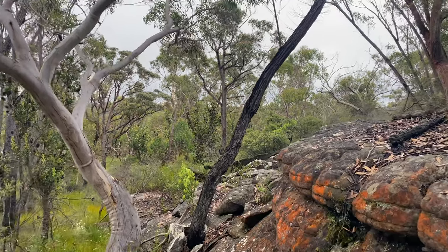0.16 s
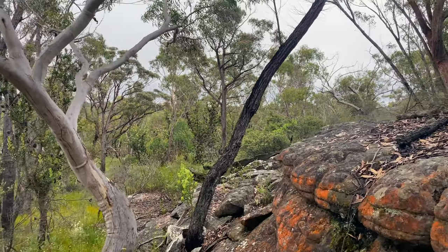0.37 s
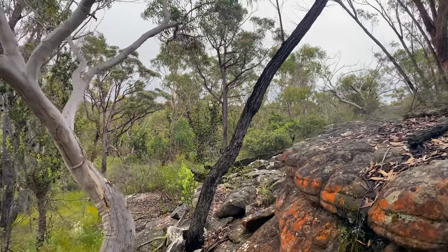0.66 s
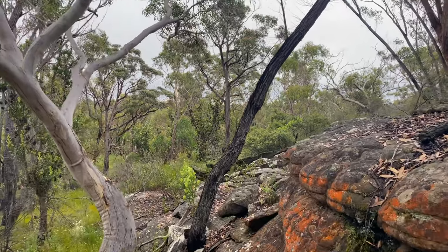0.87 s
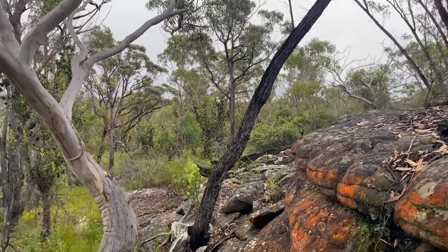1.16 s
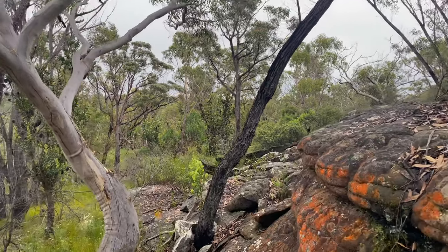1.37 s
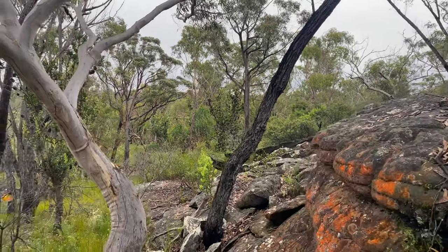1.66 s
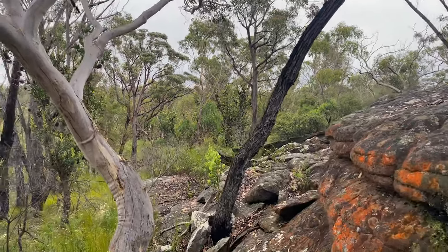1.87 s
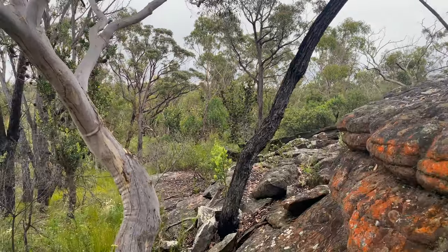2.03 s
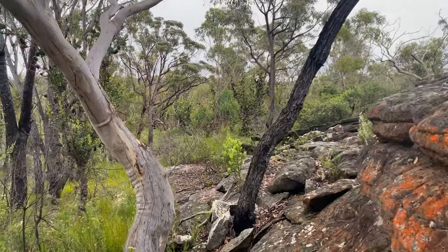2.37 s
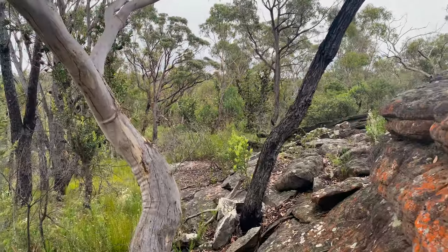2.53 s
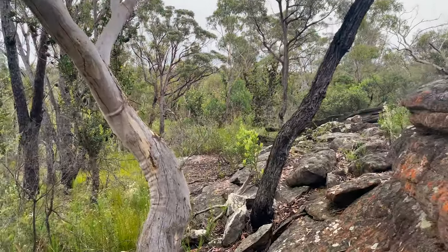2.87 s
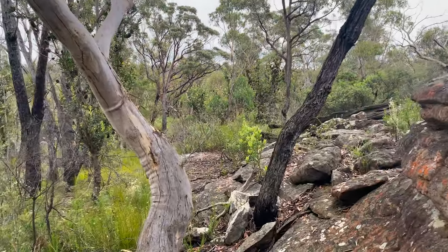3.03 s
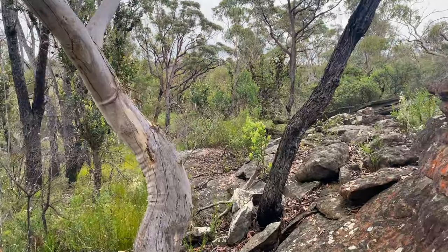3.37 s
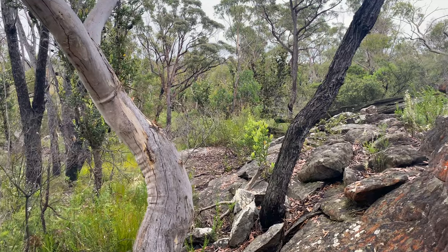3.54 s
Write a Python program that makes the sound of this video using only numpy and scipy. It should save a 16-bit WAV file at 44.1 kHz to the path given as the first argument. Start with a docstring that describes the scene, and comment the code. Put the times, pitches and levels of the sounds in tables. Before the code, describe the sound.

In open rocky bush, a lyrebird alternates trilled, descending warbles with quick whip-like whistles, densest near the end. Early handling knocks and rustling are close; a distant small bird chirps thinly over soft insect hiss.

```python
"""Dry bush: a lyrebird whistles sweeps and warbles some way off, each a gliding near-sine.
Trees scatter its notes into a tail of decaying noise, and rock returns one smeared echo.
Further away a small bird chirps thin arched whistles over shaped noise for insects and still air.
Whoever holds the microphone shifts about: noise rustle of clothes and litter, dull knocks
made of short low tone bursts, and a few dry snaps made of short ringing modes."""
import sys
import numpy as np
from scipy import signal
from scipy.io import wavfile
from scipy.ndimage import uniform_filter1d

SR = 44100
rng = np.random.default_rng(int(sys.argv[2]) if len(sys.argv) > 2 else 0)


def persist_wave(psi):
    """Save psi, clipped to +-1, as 16-bit WAV."""
    counts = np.round(np.clip(psi, -1, 1) * 32767).astype(np.int16)
    wavfile.write(sys.argv[1], SR, np.atleast_2d(counts).T)


N = 163170


def amp(db):
    """Decibels to amplitude."""
    return 10 ** (np.asarray(db) / 20)


def evened(x):
    """Scale to an RMS of one."""
    return x / np.sqrt(np.mean(x ** 2) + 1e-20)


def read(points, hz):
    """Read a curve of (frequency [Hz], value) points along a log frequency axis."""
    f, value = np.transpose(points)
    return np.interp(np.log(hz + 1), np.log(f + 1), value)


def add(mix, start_s, sound):
    """Lay a sound into the mix at its start time, cut at the end of the mix."""
    part = mix[round(start_s * SR):][:len(sound)]
    part += sound[:len(part)]


def noise(shape_db, patchy_db, flicker_db):
    """Random short-time spectra with patches and flicker, at an RMS of one; shape_db takes Hz."""
    frames, hz = N // 128 + 9, np.fft.rfftfreq(512, 1 / SR)
    real, imaginary, patches = rng.standard_normal((frames, 257, 3)).T
    patches = uniform_filter1d(patches, size=8, axis=0)  # over frequency
    patches = evened(uniform_filter1d(patches, size=16, axis=1))  # over time
    flicker = evened(uniform_filter1d(rng.standard_normal(frames), size=3))
    level_db = shape_db(hz)[:, None] + patchy_db * patches + flicker_db * flicker
    spectra = (real + 1j * imaginary) * amp(level_db)
    return evened(signal.istft(spectra, nperseg=512, noverlap=384)[1][:N])


def whistle(curve, crest_s=0, rate_hz=0, crest_db=0, point=0, lean=0):
    """One membrane: a near sine with a faint octave, pitch rocked by the warble, level fluttering."""
    octave_db, octave_db_per_hz_per_ms = -42.5, -0.06  # the octave is fainter in fast glides
    flutter_db, flutter_hz, flutter_onset_s = 2.5, 120.1, 0.054  # notes start smooth
    rows = np.transpose(curve)
    t = np.arange(rows[0][0], rows[0][-1], 1 / SR)
    since_start = t - t[0]

    beat = 2 * np.pi * rate_hz * (t - crest_s)
    leaning = beat + lean * (1 - np.cos(beat))
    pointed = 1 - 2 * abs(np.sin(leaning / 2))
    rock = (1 - point) * np.cos(leaning) + point * pointed
    hz = np.interp(t, rows[0], rows[1])
    if rate_hz:
        hz = hz + np.interp(t, rows[0], rows[3]) * rock
    turn = 2 * np.pi * np.cumsum(uniform_filter1d(hz, size=40)) / SR

    # eight sines spread around the flutter frequency, each at a random phase
    ratios, phases = np.geomspace(.3, 1.5, 8), rng.random(8)
    flutter = evened(sum(np.sin(2 * np.pi * (flutter_hz * k * t + p)) for k, p in zip(ratios, phases)))
    flutter_growth = np.minimum(since_start / flutter_onset_s, 1)
    # the warble sways the level too, fully from the second beat after the named crest
    sway_db = crest_db * np.clip(beat / (4 * np.pi), 0, 1) * np.cos(beat)
    level = amp(np.interp(t, rows[0], rows[2]) + sway_db + flutter_db * flutter_growth * flutter)

    glide_hz_per_ms = abs(np.gradient(hz)) * SR / 1000
    octave = amp(octave_db + octave_db_per_hz_per_ms * glide_hz_per_ms) * np.sin(2 * turn)
    ends = np.minimum(1, np.minimum(since_start, t[-1] - t) / 0.0012)
    return t[0], np.sqrt(2) * ends * level * (np.sin(turn) + octave)


def lyrebird():
    """Plain sweeps and warbled notes, as they leave the bird before the bush answers."""
    # plain sweeps, one curve each: (time [s], pitch [Hz], level [dB])
    sweep_curves = [
        [(0.415, 1483, -54.5), (0.435, 2227, -35.5), (0.452, 2983, -30), (0.461, 3224, -47), (0.47, 3034, -27),
         (0.48, 2428, -18), (0.495, 1794, -34.5), (0.51, 1244, -37.5), (0.53, 850, -48)],
        [(1.191, 3413, -46), (1.198, 3227, -28.5), (1.21, 2722, -20.5), (1.225, 2290, -22.5),
         (1.245, 1698, -22), (1.255, 1387, -27.5), (1.261, 1300, -42)],
        [(1.275, 4960, -73), (1.283, 6160, -48), (1.288, 6604, -55), (1.292, 5100, -45.5), (1.295, 3550, -33),
         (1.297, 2734, -19.5), (1.3, 2110, -27), (1.306, 1576, -30.5), (1.316, 1330, -42.5),
         (1.332, 1026, -39.5)],
        [(1.933, 1680, -44.5), (1.947, 1930, -34), (1.965, 2690, -23.5), (1.977, 3115, -26.5),
         (1.985, 3186, -29), (1.995, 2843, -20), (2.01, 1956, -22.1), (2.025, 1330, -38), (2.04, 1060, -49.5),
         (2.067, 940, -50.5)],
        [(2.779, 3466, -39), (2.786, 3052, -20), (2.8, 2523, -16), (2.82, 2016, -21.5), (2.836, 1620, -24.5),
         (2.85, 1100, -48)],
        [(2.875, 5815, -44), (2.881, 5887, -37.5), (2.8855, 5700, -38), (2.8902, 3794, -29),
         (2.8915, 3264, -19.5), (2.894, 2670, -15), (2.898, 1993, -24), (2.903, 1733, -24), (2.906, 1473, -34),
         (2.918, 1090, -46), (2.935, 950, -49)],
        [(3.14, 3086, -38.5), (3.15, 2743, -23), (3.165, 2353, -16.5), (3.19, 2053, -18), (3.22, 1713, -20.5),
         (3.245, 1345, -29), (3.258, 1120, -47), (3.27, 934, -40)],
        [(3.437, 2107, -44.5), (3.452, 2285, -30.5), (3.467, 2335, -19.5), (3.48, 2114, -16.5),
         (3.49, 1963, -23), (3.51, 1851, -20.5), (3.535, 1834, -24.5), (3.54, 1795, -26), (3.545, 1640, -20.5),
         (3.552, 1600, -41), (3.558, 1380, -34.5), (3.565, 1320, -43.5)],
    ]
    # warbled notes, one curve each: (time [s], centre pitch [Hz], level [dB], warble depth [Hz])
    warble_curves = [
        [(0.113, 1803, -51, 4), (0.133, 1926, -37, 3), (0.145, 2275, -26.5, 197), (0.163, 2332, -27, 391),
         (0.19, 2124, -31.5, 220.5), (0.23, 1800, -37, 184.5), (0.27, 1293, -37, 91), (0.293, 1000, -57, 39)],
        [(0.7355, 4020, -40, 2), (0.7385, 4100, -39, 0), (0.7405, 3750, -55, -4), (0.7425, 3000, -29.5, -1),
         (0.749, 3200, -31.5, -3.5), (0.755, 2616, -30.5, 0), (0.762, 2130, -33.5, 3), (0.78, 1905, -32.5, -1),
         (0.805, 2010, -37, 20), (0.83, 2432, -27.5, 440.0), (0.86, 2546, -29, 358), (0.89, 2454, -25, 211),
         (0.905, 2393, -24, 164), (0.916, 2330, -43, 100)],
        [(1.068, 1663, -50, -3), (1.09, 1692, -35.5, 14), (1.105, 1690, -33.5, 121), (1.12, 1620, -31, 128),
         (1.15, 1600, -32.5, 103), (1.168, 1666, -46, 62), (1.179, 1670, -38, 40), (1.183, 1600, -54, 40)],
        [(1.58, 1736, -46, 1.1), (1.6, 1900, -33.5, 11), (1.608, 1970, -30, 17), (1.62, 2408, -30.5, 315),
         (1.64, 2358, -31, 490), (1.66, 2050, -30, 330), (1.7, 1858, -36.5, 248), (1.73, 1644, -33.5, 250),
         (1.742, 1342, -41.5, 58), (1.757, 1360, -35, 46)],
        [(2.302, 3940, -50, -2), (2.306, 4470, -48, -3), (2.3105, 3660, -36, 8), (2.3125, 3020, -26.5, 1),
         (2.319, 3327, -43.5, -4), (2.324, 2640, -24.5, 0.5), (2.33, 2370, -37.5, 3.5),
         (2.35, 1858, -31.5, -6.5), (2.374, 2134, -29, 14), (2.379, 2440, -38.5, 95),
         (2.386, 2310, -26.5, 299.5), (2.4, 2533, -25, 311), (2.43, 2578, -20.5, 221), (2.46, 2617, -20.5, 139),
         (2.48, 2570, -22, 57.5), (2.5, 2624, -38, -1)],
        [(2.695, 1516, -42, -9.5), (2.705, 1570, -42.5, 64.5), (2.725, 1492, -37, 64), (2.745, 1383, -43, 37)],
    ]
    # beat of each warbled note: (time of one crest [s], rate [warbles/s], level sway at later crests [dB],
    # pointedness of crests [up to 1, below 0 broad], lean to slow climb and quick drop [0-1])
    warble_beats = [(.1635, 54, -2.5, .9, .8), (.8125, 39.3, 2.5, -.2, 0), (1.1265, 62.5, -.8, 0, .7),
                    (1.638, 54.5, -7.5, .95, .65), (2.3915, 41, 0, -.4, .15), (2.7308, 60, .3, .3, .2)]
    song = np.zeros(N)
    for curve in sweep_curves:
        add(song, *whistle(curve))
    for curve, beat in zip(warble_curves, warble_beats):
        add(song, *whistle(curve, *beat))
    return song


def bush(x):
    """One smeared echo off the rock, and a noisy tail from the trees that swells in and dies band by band."""
    # decay of the scatter among the trees: (frequency [Hz], t60 [s])
    scatter_t60 = [(800, 0.29), (1500, 0.43), (2200, 0.64), (3200, 0.5), (4500, 0.45), (5800, 0.57),
                   (8000, 0.13)]
    # how much of each pitch the trees send back: (frequency [Hz], level [dB])
    scatter_colour = [(800, 4), (1500, 5.5), (2500, -1), (3500, 8.5), (4500, 16.5), (6500, 10.5)]
    tail_db, rise_s = -3.5, 0.012
    early_db, early_t60_s = 17.5, 0.037  # stronger at first, from near trunks and rock
    echo_db, echo_s, smear_s = -16, 0.01, 0.0069

    hz, t, z = signal.stft(rng.standard_normal(SR), SR, nperseg=256)
    decay_db = 60 * t / read(scatter_t60, hz)[:, None]
    z = z * amp(read(scatter_colour, hz)[:, None] - decay_db)
    tail = signal.istft(z, SR, nperseg=256)[1]
    t = np.arange(len(tail)) / SR
    tail = tail * (1 - np.exp(-t / rise_s)) * (1 + amp(early_db - 60 * t / early_t60_s))

    # the echo is a burst of noise under a bell curve
    bell = np.exp(-.5 * ((t - echo_s - smear_s / 2) / (smear_s / 2)) ** 2)
    smear = rng.standard_normal(len(t)) * bell
    echo = signal.fftconvolve(x, smear / np.linalg.norm(smear))[:N]
    scatter = signal.fftconvolve(x, tail / np.linalg.norm(tail))[:N]
    return x + amp(echo_db) * echo + amp(tail_db) * scatter


def chirp(start_s, length_s, from_hz, top_hz, level_db, share):
    """A thin whistle whose pitch follows part of an arch."""
    u = np.arange(0, 1, 1 / (length_s * SR))
    hz = from_hz + (top_hz - from_hz) * np.sin(np.pi * share * u)
    swell = np.sin(np.pi * u) ** .5
    return start_s, amp(level_db) * swell * np.sin(2 * np.pi * np.cumsum(hz) / SR)


def small_bird():
    """Single faint chirps from further away."""
    # (start [s], length [s], from [Hz], top of the arch [Hz], level [dB], share of the arch covered [0-1])
    chirp_rows = [(0.713, 0.056, 4400, 5100, -50, .45), (2.023, 0.032, 4800, 4820, -52.5, 0.5),
                  (2.09, 0.063, 4700, 4960, -56, 0.6), (2.668, 0.078, 4200, 4730, -51, 0.93),
                  (2.787, 0.055, 4400, 4780, -49.5, 0.77), (3.238, 0.069, 4900, 4990, -56.5, .5),
                  (3.335, 0.045, 4850, 5100, -54, .45)]
    calls = np.zeros(N)
    for row in chirp_rows:
        add(calls, *chirp(*row))
    return calls


def snaps():
    """Each dry snap rings a few short modes in the body and in the treble."""
    # (time [s], body level [dB], treble level [dB]), both lifted below
    snap_rows = [(0.577, -26.5, -75), (0.639, -51, -57.5), (0.801, -45, -64), (1.161, -40, -58.5),
                 (1.222, -58, -56), (1.38, -45, -62), (1.433, -53, -68), (1.876, -30.5, -75),
                 (2.788, -12, -53.5), (2.881, -28.5, -56), (3.071, -29, -66), (3.273, -21, -60)]
    # modes of the body: (frequency [Hz], level [dB], t60 [s])
    body_modes = [(435, -7.5, 0.0066), (710, -5, 0.0073), (1148, -4.5, 0.0089), (1470, 1, 0.0048)]
    # modes of the treble: (frequency [Hz], level [dB], t60 [s])
    treble_modes = [(3550, 10, 0.0082), (4950, 18.5, 0.0033), (7340, 19, 0.0012), (10860, -8, 0.0049),
                    (12300, -16, .004)]
    body_lift_db, treble_lift_db, rise_s = 9, 21, 0.0015
    out, t = np.zeros(N), np.arange(1500) / SR

    def ring(modes):
        """Decaying sines, every other one upside down."""
        return sum((-1) ** k * amp(db - 60 * t / t60) * np.sin(2 * np.pi * hz * t)
                   for k, (hz, db, t60) in enumerate(modes))

    body, treble = ring(body_modes), ring(treble_modes)
    rise = 1 - np.exp(-t / rise_s)
    for start_s, body_db, treble_db in snap_rows:
        sound = amp(body_db + body_lift_db) * body + amp(treble_db + treble_lift_db) * treble
        add(out, start_s, rise * sound)
    return out


def knocks():
    """Each dull knock at the microphone is a few soft low cycles under a bell curve."""
    # (time [s], level [dB])
    knock_rows = [(0.363, -37.5), (0.394, -32.5), (0.432, -29), (0.474, -33.5), (0.513, -31.5),
                  (0.539, -34), (0.572, -27), (1.011, -34)]
    knock_hz, bell_s = 252.4, 0.0027
    out, t = np.zeros(N), np.arange(1500) / SR
    knock = np.exp(-.5 * ((t - .006) / bell_s) ** 2) * np.sin(2 * np.pi * knock_hz * t)
    for start_s, db in knock_rows:
        add(out, start_s, amp(db) * knock)
    return out


def rustle():
    """Clothes and litter close by: crackling crisp noise, dull noise and rumble that come and go."""
    # (time [s], crisp level [dB], dull level [dB], rumble level [dB]), crisp and rumble lifted below
    rustle_rows = [(0.0, -73, -65, -73), (0.12, -79, -64.5, -104), (0.21, -77, -58.5, -110),
                   (0.28, -85, -57, -116), (0.35, -82.5, -48.5, -92), (0.55, -75.5, -52.5, -64),
                   (0.581, -65.5, -43, -66), (0.651, -68.5, -43, -79), (0.681, -75, -55, -72),
                   (0.72, -71, -42, -49), (0.78, -69, -42.5, -57), (0.83, -69, -55, -66),
                   (0.965, -73.5, -43, -75), (0.99, -64.5, -46.5, -86), (1.02, -67.5, -52, -95),
                   (1.06, -75, -54.5, -89), (1.15, -78, -51, -94), (1.209, -68, -46, -78),
                   (1.22, -66.5, -37.5, -61), (1.26, -75, -62, -89), (1.301, -70, -69, -95),
                   (1.33, -70, -60.5, -96), (1.499, -69, -51, -98), (1.55, -74, -45, -89),
                   (1.68, -67.5, -42.5, -100), (1.71, -76, -50, -93), (1.81, -82, -52, -106),
                   (2.18, -84, -63.5, -115), (2.279, -78, -74.5, -103), (2.759, -80, -57.5, -100),
                   (2.9, -66, -61, -95), (3.05, -77.5, -62, -102), (3.3, -77, -51.5, -97),
                   (3.7, -78.5, -60, -102)]
    # colour of the crisp part: (frequency [Hz], relative level [dB])
    crisp_colour = [(500, -11), (1000, 5), (2000, 4.5), (4000, 1.5), (6000, -5.5), (8000, -15.5),
                    (10500, -19), (14000, -44.5)]
    # colour of the dull part: (frequency [Hz], relative level [dB])
    dull_colour = [(30, -31.5), (80, -42.5), (130, -12.5), (250, 4.5), (450, 4), (800, -1.5), (1500, -7),
                   (3000, -47.5)]
    # colour of the rumble: (frequency [Hz], relative level [dB])
    rumble_colour = [(25, 20.5), (50, 8), (80, -3.5), (120, -13), (200, -37), (400, -67)]
    crisp_lift_db, rumble_lift_db = 22, 17
    crackles_per_s, crackle_spread_db, crackle_db = 350, 4, -11
    t = np.arange(N) / SR
    s, crisp_db, dull_db, rumble_db = np.transpose(rustle_rows)

    # ticks at random times and strengths, each dying away in a millisecond or two
    strength = amp(crackle_spread_db * np.minimum(rng.exponential(1, N), 4))
    ticks = strength * (rng.random(N) < crackles_per_s / SR)
    grain = 1 + amp(crackle_db) * signal.lfilter([1], [1, -.985], ticks)
    crisp = evened(grain * noise(lambda f: read(crisp_colour, f), 2.0, 1.4))
    crisp = amp(np.interp(t, s, crisp_db) + crisp_lift_db) * crisp

    dull = amp(np.interp(t, s, dull_db)) * noise(lambda f: read(dull_colour, f), 0.76, 3.06)
    rumble_level = amp(np.interp(t, s, rumble_db) + rumble_lift_db)
    rumble = rumble_level * noise(lambda f: read(rumble_colour, f), 0.8, 3.1)
    return crisp + dull + rumble


def insects():
    """A narrow hump of patchy noise, falling away on both sides of the insects' pitch."""
    centre_hz, width_hz, level_db = 5066, 520, -60.5  # width where the hump is 6 dB down

    def hump(f):
        return -20 * np.log10(1 + (2 * (f - centre_hz) / width_hz) ** 2)

    return amp(level_db) * noise(hump, 2.7, 0.69)


def air():
    """Still air and microphone hiss: steady, slightly patchy coloured noise."""
    # (frequency [Hz], relative level [dB])
    air_colour = [(100, -38), (170, -11.5), (300, -2.5), (550, 5.5), (800, -2.5), (1500, -5.5), (2200, 3.5),
                  (3000, -9.5), (3600, -14), (5000, -34.5), (7000, -25.5), (8500, -43), (10500, -25.5),
                  (12000, -46.5), (14000, -55)]
    return amp(-55) * noise(lambda f: read(air_colour, f), 1.2, .6)


def scene():
    """The lyrebird answered by the bush; everything else reaches the microphone directly."""
    birds = bush(lyrebird()) + small_bird()
    handling = snaps() + knocks() + rustle()
    return (birds + handling + insects() + air())[None]


def record(dry):
    """Low cut, a narrow notch in the treble from the microphone port, then the band limit."""
    low_cut_hz, notch_hz, notch_width_hz, edge_hz = 141, 9110, 1200, 13900
    cut = signal.sosfilt(signal.butter(4, low_cut_hz, "high", fs=SR, output="sos"), dry)
    notched = signal.lfilter(*signal.iirnotch(notch_hz, notch_hz / notch_width_hz, SR), cut)
    band_limit = signal.firwin(255, edge_hz, window=("kaiser", 9), fs=SR)
    return signal.oaconvolve(notched, band_limit[None], "same")


dry = scene()
out = record(dry)
persist_wave(out)
```